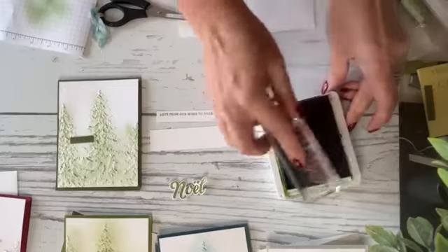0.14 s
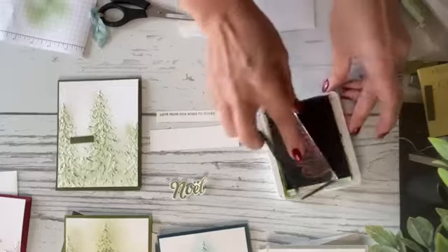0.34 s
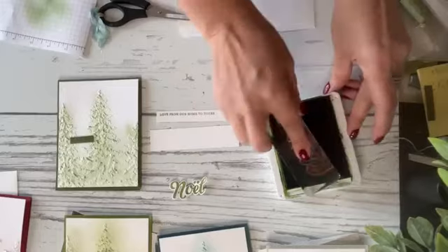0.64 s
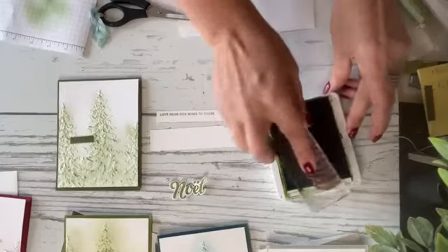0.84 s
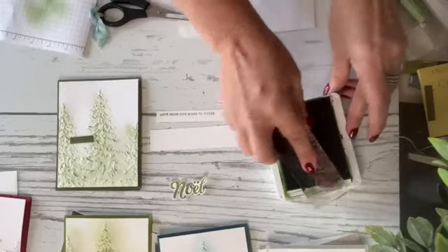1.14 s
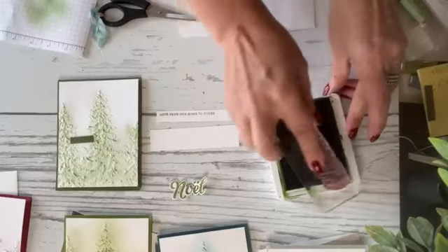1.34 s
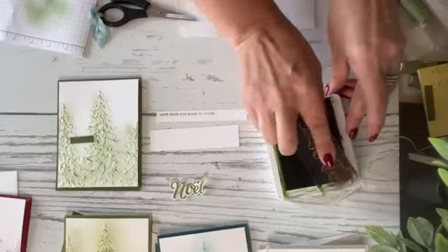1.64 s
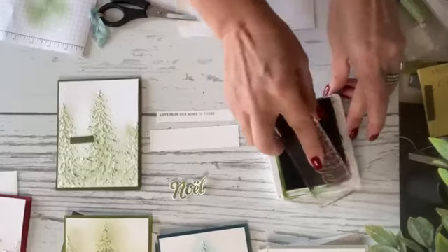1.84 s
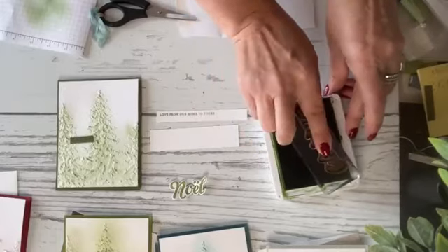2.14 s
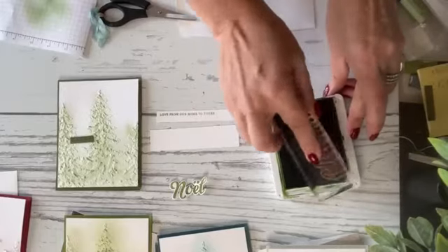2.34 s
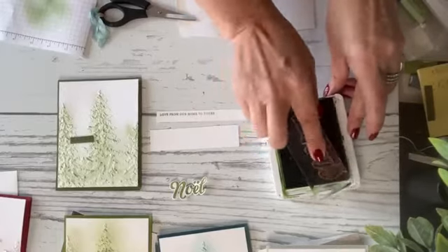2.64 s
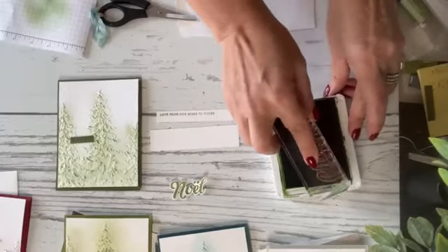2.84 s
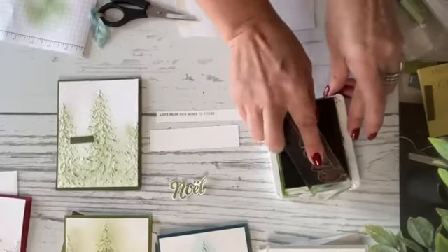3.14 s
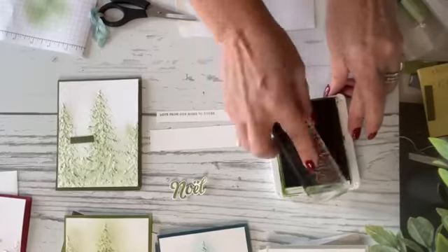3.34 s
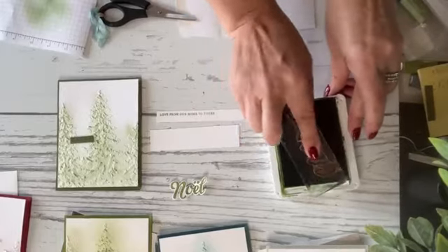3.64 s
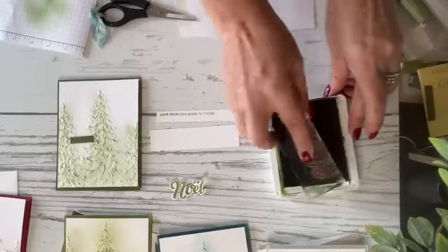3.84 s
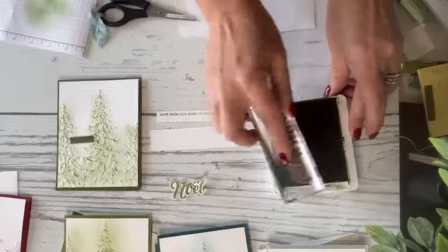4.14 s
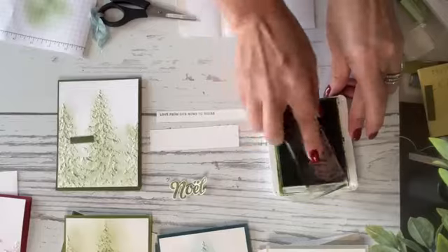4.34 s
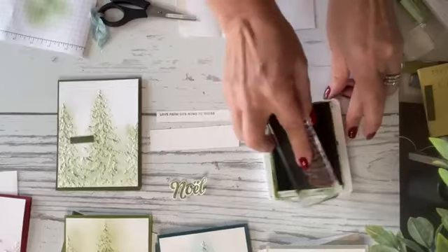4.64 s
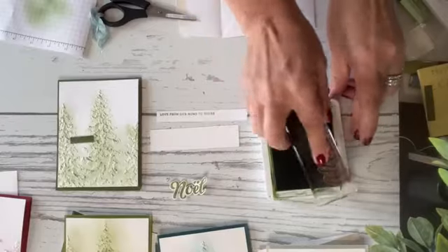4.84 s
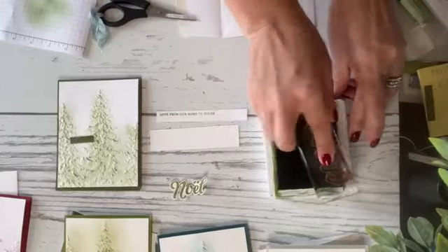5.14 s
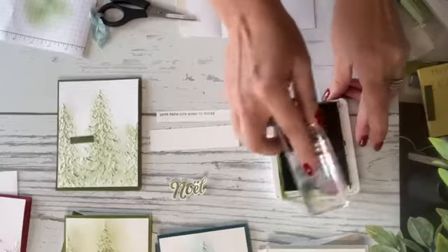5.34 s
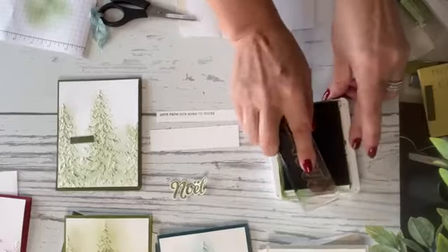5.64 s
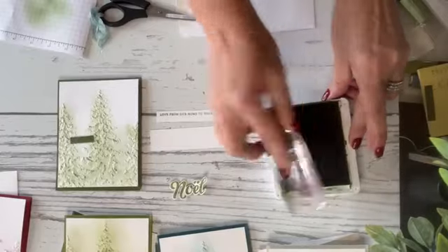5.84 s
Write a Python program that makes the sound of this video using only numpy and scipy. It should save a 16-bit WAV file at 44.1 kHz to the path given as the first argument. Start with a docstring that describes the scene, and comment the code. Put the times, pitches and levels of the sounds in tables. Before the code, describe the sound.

Close to a phone in a small room, a hard acrylic block is dabbed on a hollow plastic ink pad about every quarter second. Each knock is short, woody-plastic and mid-pitched, with a small edge click and light table thump. Firm landings alternate with softer clustered clicks and tiny tacky crackles as the block lifts. A longer gap comes after the first loud tap; faint room hush underneath.

```python
"""Stamp block on an ink pad

An acrylic stamp block is tapped onto a plastic-cased ink pad on a table and peeled off again, close to a phone.
Each knock or click drives damped modes of the hollow case, the block and the table top with a short noisy push.
Swelling noise snaps make the tacky ink crackle; low bumps shudder and faint noise bands hiss between knocks.
A small room adds five echoes and a short noise tail, over a faint steady hush.
"""
import sys
import numpy as np
from scipy import signal
from scipy.fft import rfft, irfft
from scipy.io import wavfile
from scipy.ndimage import uniform_filter1d

SR = 44100
rng = np.random.default_rng(int(sys.argv[2]) if len(sys.argv) > 2 else 0)


def put_to_file(sound):
    """Save the sound as 16-bit audio at rate SR, in the file named by the first command-line argument."""
    columns = np.atleast_2d(sound).T  # one column per channel
    safe = np.clip(columns, -1, 1)
    whole_steps = np.round(safe * 32767)
    wavfile.write(sys.argv[1], SR, whole_steps.astype(np.int16))


N = 264996  # length [samples]
AIR_HZ, AIR_WIDTH_HZ = 13000, 6000  # the airy top of ticks and crackle


def undb(db):
    """Gain of a dB value."""
    return 10 ** (np.asarray(db) / 20)


def unit(x):
    """Scales to rms 1."""
    return x / np.sqrt(np.mean(x ** 2))


def band(x, hz, width_hz):
    """Band-pass around a centre, kept within the usable range."""
    edges = [max(hz - width_hz / 2, 15), min(hz + width_hz / 2, SR * .47)]
    return signal.sosfilt(signal.butter(2, edges, "band", fs=SR, output="sos"), x)


def add(track, s, sound):
    """Mixes a sound in at a time in seconds."""
    i = int(s * SR)
    track[i:i + len(sound)] += sound[:len(track) - i]


def hold(start, length, edge):
    """Envelope that rises, holds and falls; all times in seconds."""
    t = np.arange(N) / SR
    return np.clip(np.minimum(t - start, start + length - t) / edge, 0, 1)


# Spectral shape of the background: (frequency [Hz], relative level per Hz [dB])
HUSH_SHAPE = [(15, -46), (25, -19), (108, -0.5), (212, -12.5), (416, -4), (575, -21), (1040, -6.5),
              (1370, -17), (3340, -22), (9570, -29.5), (14400, -33.5), (16000, -27)]
HUSH_DB = -79  # overall rms


def hush():
    """Steady background noise, shaped in the spectrum between the table's points."""
    hz, db = np.transpose(HUSH_SHAPE)
    f = np.fft.rfftfreq(N, 1 / SR) + 1  # 1 Hz up, so the logarithm exists
    shape = undb(np.interp(np.log(f), np.log(hz), db))
    return undb(HUSH_DB) * unit(irfft(rfft(rng.standard_normal(N)) * shape, N))


def ring(modes, push, tilt_db, stretch, size):
    """Damped modes driven by a push, peak 1; stretch scales every decay time."""
    hz, db, t60 = np.transpose(modes)
    t = np.arange(size)[:, None] / SR
    decay = np.exp(-np.log(1000) * t / (t60 * stretch))
    impulse = (np.sin(2 * np.pi * hz * t) * decay) @ undb(db + tilt_db)
    y = signal.fftconvolve(impulse, push)[:size]
    return y / np.abs(y).max()


def blip(hz, width_hz, db):
    """One pulse through a broad resonance, with its peak at the given level."""
    y = band(band(np.arange(2048) == 0, hz, width_hz), hz, width_hz)
    return undb(db) * y / np.abs(y).max()


# A firm knock keeps the hand on the case and damps it: ring length factor at -25.5 dB, change per dB
RING_STRETCH, STRETCH_PER_DB = 0.83, -0.02
# A dull knock spreads more into the room: share at a 0 dB click [dB], change per dB of click
ROOM_SHARE_DB, SHARE_PER_CLICK_DB = -24, -0.31
# The tick against the ring at a 0 dB click [dB], and its fall per dB as the click dulls
TICK_DB, TICK_PER_CLICK = -9, 1.25
CONTACT_CYCLES = 3.47  # time scale of the contact, in periods of the favoured pitch

# Knocks and clicks of the stamp landing on the pad and lifting off:
# (time [s], case ring peak [dB], favoured case pitch [Hz],
# table thump before its slow onset, against the ring [dB], edge click against the ring [dB])
STAMP_KNOCKS = [(0.08, -9, 937, -13, -8.5), (0.247, -32.5, 1210, -29, -13), (0.348, -33, 820, -21, -18),
                (0.365, -38.5, 764, -24, -25.5), (0.379, -31, 1030, -12.5, 0.5),
                (0.41, -27, 1180, -47, -5.5), (0.714, -13, 808, -11, -5), (0.957, -25, 910, -14.5, -8),
                (0.99, -34.5, 980, -8, -3), (1.008, -35, 990, -38, -5.5), (1.203, -19.5, 817, -10.5, -9.5),
                (1.453, -30, 770, -5.5, -14), (1.496, -32.5, 1100, -42, -1.5),
                (1.517, -32.5, 1010, -42, -7.5), (1.732, -19.5, 970, -9.5, -6),
                (1.962, -50.5, 690, -10.5, -19), (2.006, -52, 777, -18, -15),
                (2.024, -27, 785, -16.5, -8.5), (2.053, -47.5, 800, -2, 8), (2.274, -18.5, 1030, -13.5, -6),
                (2.525, -51, 746, -36, -10.5), (2.55, -29.5, 800, -20, -12.5),
                (2.570, -38.5, 716, -27, -29), (2.583, -14.5, 774, -10.5, -4.5),
                (2.842, -24.5, 923, -7, -5.5), (3.105, -28.5, 806, -10, -14), (3.127, -36, 700, -17, -0.5),
                (3.149, -40, 1030, -7.5, -6), (3.378, -24, 817, -5.5, -6.5), (3.616, -31, 705, -7.5, -15.5),
                (3.633, -42, 782, -23, -1.5), (3.865, -16.5, 1030, -7, -6), (4.123, -51, 769, 2, -10),
                (4.146, -35.5, 684, -44, -12.5), (4.18, -43, 1030, -5.5, -12),
                (4.626, -20.5, 917, -13.5, -9), (4.882, -38.5, 700, -35, -24),
                (4.897, -33.5, 830, -4, -1.5), (4.919, -28.5, 1190, -6, -2.5),
                (4.927, -30, 1000, -11.5, -2.5), (4.938, -27.5, 1030, -17, -3.5),
                (5.170, -27.5, 675, -8.5, -10.5), (5.443, -29, 1090, -18, -4.5), (5.462, -28, 717, -15, -8),
                (5.517, -21, 1065, -16, -0.5), (5.755, -59.5, 1235, -47, -22.5),
                (5.855, -14, 820, -9, -10.5)]
# Modes of the hollow plastic case: (frequency [Hz], level before each knock's tilt [dB], t60 before stretch [s])
CASE_MODES = [(714, -4.5, 0.15), (793, 4.5, 0.047), (945, -4.5, 0.036), (1030, 5.5, 0.034),
              (1024, 14, 0.016), (1160, 14, 0.015), (1450, 4.5, 0.017)]
# Modes of the acrylic block: (frequency [Hz], level before random scatter [dB], t60 before stretch [s])
BLOCK_MODES = [(1877, 9, 0.015), (2091, 0, 0.033), (2552, 1.5, 0.0073), (2810, 1, 0.0091),
               (3150, 7, 0.0042), (3970, -0.5, 0.0044), (4420, -5, 0.0029), (5540, -4.5, 0.0019)]
# Modes of the table top: (frequency [Hz], level before random scatter [dB], t60 before stretch [s])
TABLE_MODES = [(54.74, -14.5, 0.87), (104.2, 3.5, 0.33), (146.55, 2.5, 0.45), (186.7, 0.5, 0.3),
               (214, -3.5, 0.15), (269, -10.5, 0.28), (354, -1.5, 0.046), (475, 1, 0.016)]


def knocks():
    """A short uneven contact drives case, block and table; returns near sound, echo feed and tail feed."""
    near, echo, feed = np.zeros(N), np.zeros(N), np.zeros(N)
    grit = rng.standard_normal((len(STAMP_KNOCKS), 1024))
    scatter = rng.standard_normal((len(STAMP_KNOCKS), 3, 8))
    t, late = np.arange(1024) / SR, np.arange(16000) / SR
    # what the room as a whole hears of the thump, the click and the tick
    low, click = blip(220, 464, db=0), blip(2620, 3500, db=6.6)
    high = blip(6800, 4670, db=15.3) + blip(AIR_HZ, AIR_WIDTH_HZ, db=6.0)
    for (s, db, hz, thump_db, click_db), noise, luck in zip(STAMP_KNOCKS, grit, scatter):
        tick_db = TICK_PER_CLICK * click_db + TICK_DB
        room_db = ROOM_SHARE_DB + SHARE_PER_CLICK_DB * click_db
        stretch = max(RING_STRETCH + STRETCH_PER_DB * (db + 25.5), .2)
        rise = t * hz / CONTACT_CYCLES
        force = rise ** 2 * np.exp(-3.5 * rise)

        # each contact favours the case modes near one pitch
        favour_db = -40 * np.log2(np.array(CASE_MODES)[:, 0] / hz) ** 2
        case_tilt_db = favour_db + 0.52 * luck[0, :len(CASE_MODES)]
        body = ring(CASE_MODES, force * band(noise, hz, 780), case_tilt_db, stretch, size=8192)

        # the hard edge adds a short click, and a tick above it
        edge = np.exp(-t / .0017) * np.minimum(t / .0003, 1)
        edge_push = edge * band(noise, 4300, 4300)
        body += undb(click_db) * ring(BLOCK_MODES, edge_push, 1.7 * luck[1], 0.97, size=8192)
        tick = edge * band(band(noise[::-1], 7000, 4900), 7000, 4900)
        tick += undb(-19.5) * edge * band(noise, AIR_HZ, AIR_WIDTH_HZ)
        body[:len(t)] += undb(tick_db) * tick / np.abs(tick).max()

        # the table top takes a while to start booming
        thump = ring(TABLE_MODES, force[:64], 3.0 * luck[2], 0.8, size=len(late))
        thump *= 1 - np.exp(-(late / 0.007) ** 2)
        add(near, s - .0007, undb(db) * body)
        add(near, s, undb(db + thump_db) * thump)

        # a faint soft onset of the case a few milliseconds before each knock
        onset_push = np.hanning(300) * band(noise, hz, 900)[-300:]
        onset = ring(CASE_MODES, onset_push, favour_db, .5, size=2048)
        add(near, s - .005, undb(db - 23) * onset)

        add(echo, s - .0007, undb(db + room_db) * body)
        # summed over all directions the knock has a smooth spectrum
        spread = blip(hz, 0.7 * hz, db=0) + undb(-6) * body[:len(click)]
        spread += undb(click_db) * click + undb(tick_db) * high
        add(feed, s, undb(db + room_db) * spread)
        add(feed, s, undb(db + thump_db - 15) * low)
    return near, echo, feed


# Single reflections: (delay [s], level before the dulling band-pass [dB])
REFLECTIONS = [(.0045, -6), (.009, -5), (.0195, 5), (.024, 3), (.033, -7)]


def echoes(x):
    """Table, ceiling and walls send single, duller copies back."""
    out = np.zeros(N)
    for s, db in REFLECTIONS:
        add(out, s, undb(db) * x)
    return band(out, 4000, 7640)


# Bands of the room's tail: (centre [Hz], t60 [s], level before bandwidth weighting and tail gain [dB])
TAIL_BANDS = [(77, 0.28, 2.5), (129, 0.19, -4), (241, .42, 4), (330, 0.092, -5.5), (550, 0.7, -9.5),
              (970, 0.38, -3.5), (2000, 0.39, 1.5), (4320, 0.33, -3), (6940, 0.29, -6),
              (14200, 0.094, -4.5)]


def room(x):
    """Reflections that arrive in uneven clumps, build up fast and die away band by band."""
    t = np.arange(SR // 2) / SR
    tail = 0
    for hz, t60, db in TAIL_BANDS:
        noise = unit(band(rng.standard_normal(len(t)), hz, 0.86 * hz))
        tail = tail + undb(db - 60 * t / t60) * noise * np.sqrt(hz / 1000)
    clumps = undb(2.5 * unit(uniform_filter1d(rng.standard_normal(len(t)), size=90)))
    build_up = np.clip(t / 0.00081, 0, 1)
    return signal.fftconvolve(x, undb(-30.5) * build_up * clumps * tail)[:N]


PEEL_FADE_RATIO = 0.32  # fade time against swell time
PEEL_BRIGHT_DB, PEEL_CASE_DB = -31.5, 5.5  # airy top, and snaps through the hollow case, against the crackle

# Tacky ink letting go as the stamp lifts or slides:
# (time of the swell's peak [s], crackle level at that peak [dB], swell time [s])
INK_PEELS = [(.37, -62.5, 0.065), (0.961, -63.5, 0.081), (1.46, -65.5, 0.069), (2.019, -65.5, 0.04),
             (2.549, -71, 0.038), (3.11, -68, .04), (3.626, -59.5, 0.024), (3.939, -58.5, 0.046),
             (4.149, -68.5, 0.065), (4.91, -53.5, 0.038), (5.46, -63, 0.034)]


def peel():
    """Dense tiny snaps of ink threads that swell, flicker and fade."""
    snaps = rng.standard_normal(N) * undb(2.5 * rng.exponential(size=N))
    snaps *= undb(3.0 * unit(uniform_filter1d(rng.standard_normal(N), size=300)))  # flicker
    top = unit(band(band(snaps, AIR_HZ, AIR_WIDTH_HZ), AIR_HZ, AIR_WIDTH_HZ))
    crackle = unit(band(snaps, 2800, 3900))
    hollow = unit(band(snaps, 1200, 500))
    mix = undb(PEEL_BRIGHT_DB) * top + crackle + undb(PEEL_CASE_DB) * hollow
    t, out = np.arange(N) / SR, 0
    for s, db, swell in INK_PEELS:
        shape = np.exp(-((t - s) / np.where(t < s, swell, swell * PEEL_FADE_RATIO)) ** 2)
        out = out + shape * undb(db) * mix
    return out


SHUDDER_START_S, SHUDDER_LENGTH_S, SHUDDER_EDGE_S = .8, .15, .045
SHUDDER_DB, SHUDDER_HZ = -45.5, 74  # level, mean rate of the bumps


def shudder():
    """Nearly even soft bumps ring a low resonance of the table."""
    bumps, luck = np.zeros(N), rng.standard_normal((2, 400))
    at = np.cumsum(SR / SHUDDER_HZ * (1 + 0.027 * luck[0])).astype(int)
    bumps[at[at < N]] = undb(2.0 * luck[1][at < N])
    envelope = hold(SHUDDER_START_S, SHUDDER_LENGTH_S, SHUDDER_EDGE_S)
    return undb(SHUDDER_DB) * envelope * unit(band(bumps, 292, 203))


HISS_EDGE_S, HISS_FLICKER_DB = .015, 1.5  # fade in and out, rms of the flicker

# Faint rubbing between knocks: (start [s], length [s], centre [Hz], width [Hz], level before flicker [dB])
RUBS = [(1.342, .11, 6050, 700, -70), (1.348, .1, 7600, 1500, -69), (5.25, .17, 5000, 1500, -76),
        (5.19, .22, 13500, 3500, -83), (5.2, .24, 3500, 5500, -69), (4.67, .2, 4000, 6500, -72),
        (4.67, .2, 13000, 4000, -86)]


def hiss():
    """Short bands of noise, each with its own slight flicker."""
    out = 0
    for s, length, hz, width_hz, db in RUBS:
        flicker_db = HISS_FLICKER_DB * unit(uniform_filter1d(rng.standard_normal(N), size=800))
        noise = unit(band(rng.standard_normal(N), hz, width_hz))
        out = out + undb(db + flicker_db) * hold(s, length, HISS_EDGE_S) * noise
    return out


def scene():
    """Near sounds, their echoes and room tail, and the hush."""
    near, echo, feed = knocks()
    small = peel() + hiss() + shudder()
    tail = room(feed + undb(-21.5) * small)
    return (near + small + echoes(echo) + tail + hush())[None]


def record(dry):
    """The phone thins the deep bass and cuts the top steeply above 15.9 kHz."""
    thin = signal.sosfilt(signal.butter(3, 60, "high", fs=SR, output="sos"), dry)
    return signal.sosfilt(signal.ellip(8, .2, 70, 15900, fs=SR, output="sos"), thin)


dry = scene()
out = record(dry)
put_to_file(out)
```